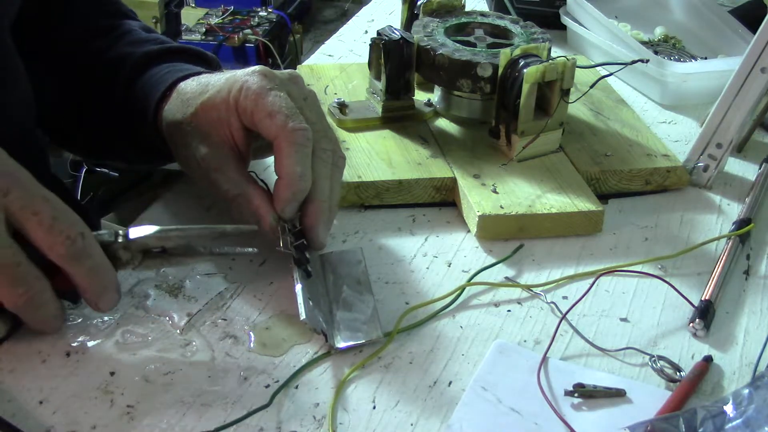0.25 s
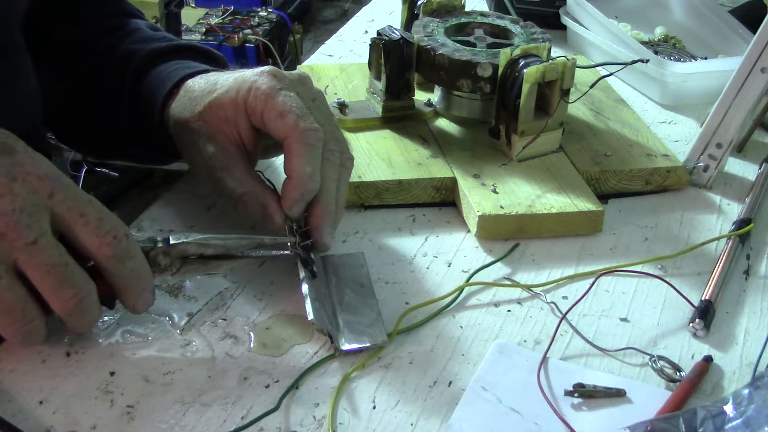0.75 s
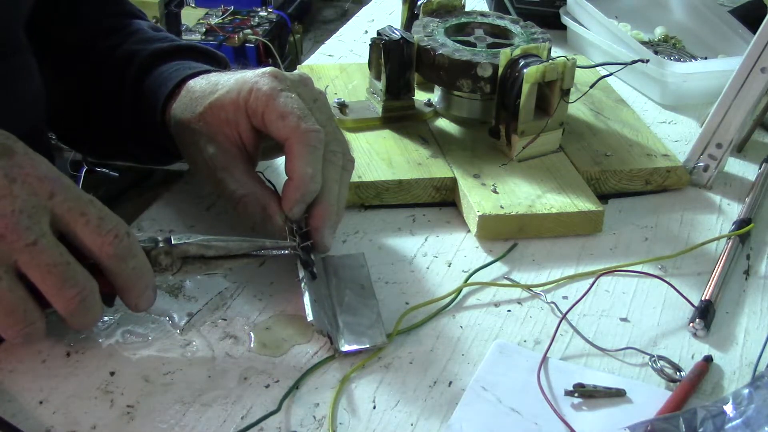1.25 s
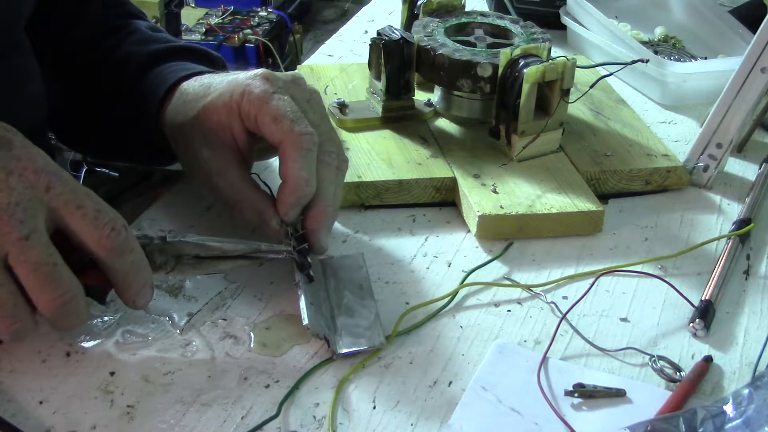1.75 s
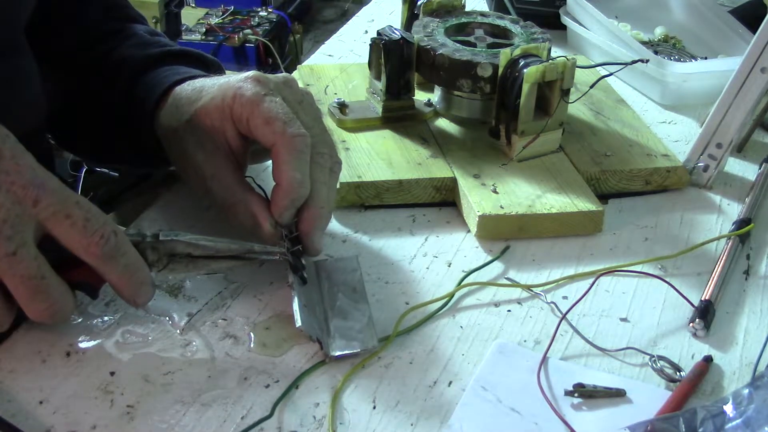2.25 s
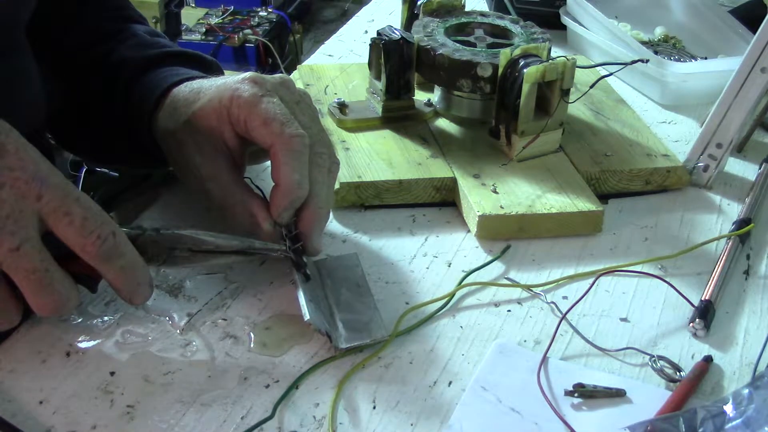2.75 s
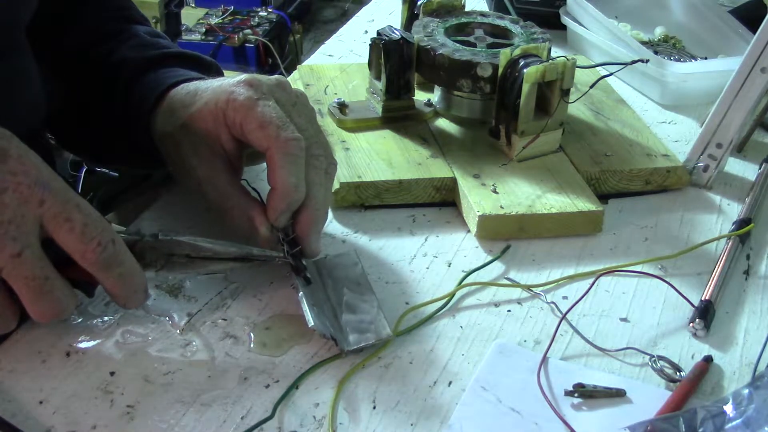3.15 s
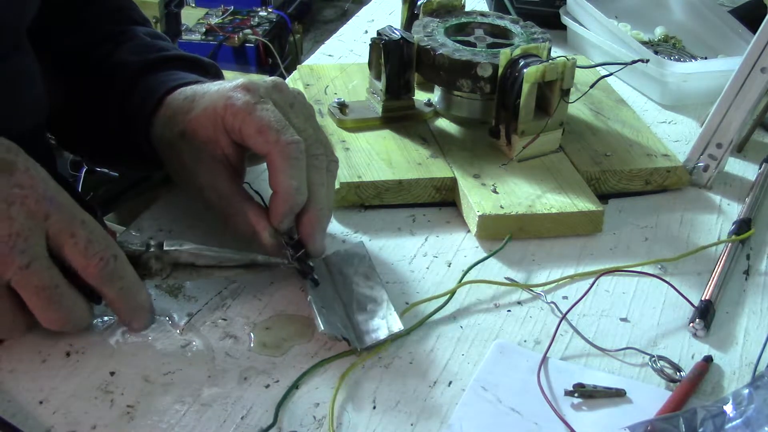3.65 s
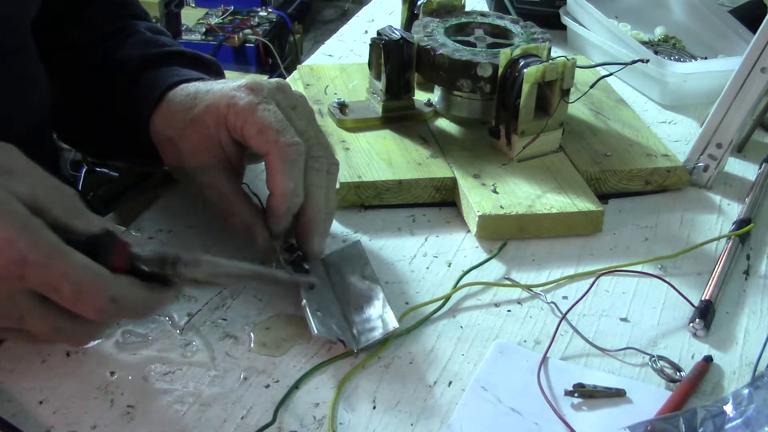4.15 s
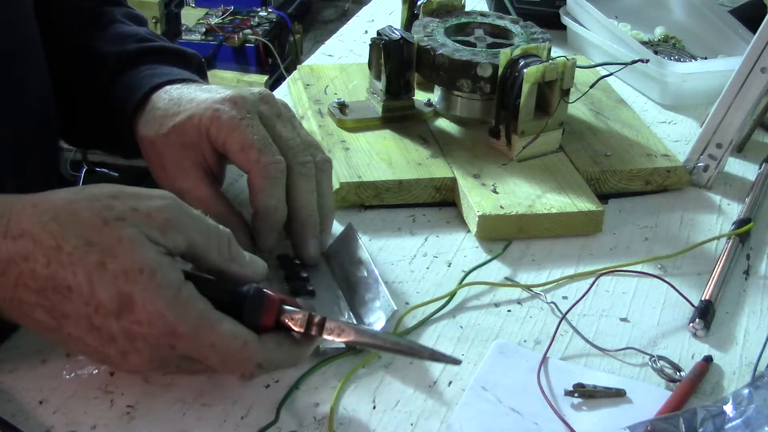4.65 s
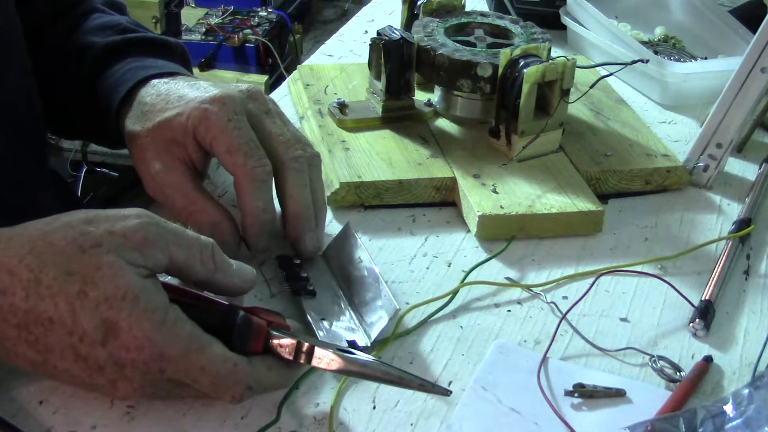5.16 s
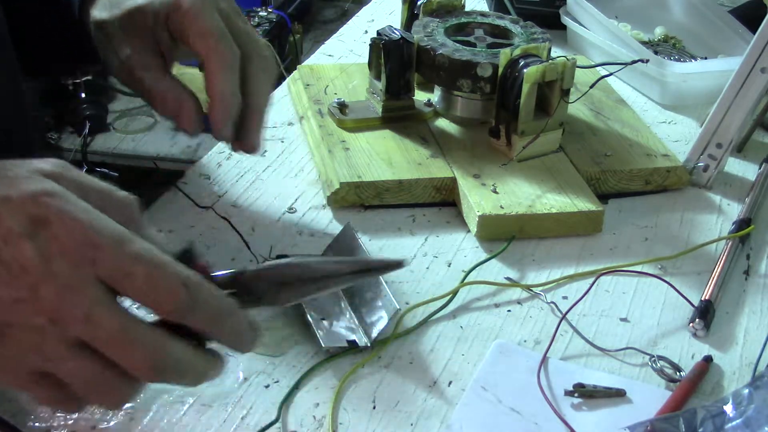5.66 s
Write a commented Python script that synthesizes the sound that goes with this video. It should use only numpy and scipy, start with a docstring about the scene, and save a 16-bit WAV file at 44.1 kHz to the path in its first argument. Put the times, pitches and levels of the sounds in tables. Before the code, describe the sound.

Close up, hands work a wire with pliers against a small metal bracket, over the constant low buzz of a transformer in a small room. Faint rustling comes first, with scattered bumps on wood and small steel clicks. The jaws then snap sharply, pinging the bracket, and the wire gives one short squeak. Quick knocks, clicks and fingertip taps on the bench lead to a soft closing rub.

```python
"""A transformer buzzes throughout in a small workshop. Close by, hands work a wire with pliers against
a sheet-metal bracket on a wooden bench. First skin and wire rustle; then fingers and tool bump the board
and the jaws click and slip, pinging the bracket, hardest at 3.6 s. At 4 s the wire slips in the jaws
with one rising squeak. A cluster of knocks, clicks and hollow taps follows, and a last rub fades out."""
import sys
import numpy as np
from scipy import signal
from scipy.fft import rfft, irfft, next_fast_len
from scipy.io import wavfile
from scipy.ndimage import map_coordinates

SR = 44100
rng = np.random.default_rng(int(sys.argv[2]) if len(sys.argv) > 2 else 0)


def output_pcm(signal):
    """Save a mono or channel-first signal as 16-bit PCM at the path in sys.argv[1].

    Samples are clipped to [-1, 1] before scaling.
    """
    pcm = np.clip(np.atleast_2d(signal).T, -1, 1) * 32767
    wavfile.write(sys.argv[1], SR, np.round(pcm).astype(np.int16))


N = 260631
T = np.arange(N) / SR
BUZZ_HZ = 120.024  # twice the mains frequency

# the bracket's ringing modes: (frequency [Hz], relative level [dB], t60 [s])
BRACKET_MODES = [(1338, -14, 0.083), (2663, -9, 0.063), (2795, -11.5, 0.068), (4380, -31, .13),
                 (5090, -25.5, .1), (6970, -17.5, 0.088), (8270, -18.5, 0.031), (10380, -9.5, 0.027),
                 (10720, -16, 0.022)]
# steel on steel: (time [s], snap gain [dB], tone centre [Hz], tone width [octaves], ring gain [dB])
JAW_CLICKS = [(.7912, -39.5, 8800, .55, -33.5), (.898, -43, 7500, .5, -45), (.92, -45, 8800, .6, -42),
              (1.30, -43.5, 4550, .56, -70), (1.975, -34.5, 4930, 1.06, -64),
              (2.124, -39.5, 3500, 1.2, -70), (2.1715, -25, 14000, 1.6, -64),
              (2.1726, -23.5, 1300, 1.3, -58), (3.6305, -14, 5800, 1.4, -35), (3.661, -30, 4000, 1.5, -55),
              (3.684, -24.5, 3400, 1.5, -37), (3.739, -50, 8000, .8, -38.5), (3.758, -30.5, 2500, .6, -55),
              (3.80, -45, 7500, .8, -49), (4.562, -31, 2750, 1, -28.5), (4.6682, -27, 2720, 1.14, -52),
              (4.769, -33, 2800, 1.44, -46), (4.789, -38.5, 2500, 1, -59), (5.168, -34, 1700, 2.2, -45)]
# dull knocks of the tool on the board: (time [s], level [dB], tone centre [Hz])
TOOL_KNOCKS = [(3.757, -35, 380), (3.802, -39, 280), (4.514, -37, 340), (4.606, -26, 240),
               (4.6293, -25.5, 620), (4.722, -29.5, 265), (4.839, -33.5, 300)]


def amp(db):
    """Decibels to gain."""
    return 10 ** (np.asarray(db) / 20)


def unit(x):
    """Scale to rms 1."""
    return x / np.sqrt(np.mean(x ** 2) + 1e-20)


def along(points, hz):
    """Read (frequency, value) points on a log-frequency axis."""
    freqs, values = np.transpose(points)
    return np.interp(np.log(hz + 1), np.log(freqs + 1), values)


def bell(hz, centre, octaves):
    """A bell of gain on the log-frequency axis."""
    return np.exp(-.5 * (np.log2((hz + 1) / centre) / octaves) ** 2)


def swell(time, width_s):
    """A Gaussian envelope of height 1."""
    return np.exp(-.5 * ((T - time) / width_s) ** 2)


def wobble(rate):
    """A smooth random curve, rate knots a second."""
    return map_coordinates(rng.standard_normal(int(N * rate / SR) + 4), [T * rate])


def filtered(x, response):
    """Zero-phase EQ by a gain function of frequency."""
    size = next_fast_len(N + SR // 2)
    return irfft(rfft(x, size) * response(np.fft.rfftfreq(size, 1 / SR)), size)[..., :N]


def sharp_impulse(response, size=1024):
    """The minimum-phase impulse of energy 1 with this tone colour."""
    cepstrum = irfft(np.log(response(np.fft.rfftfreq(size, 1 / SR)) + 1e-5))
    lag = np.arange(size)
    fold = (1 + np.sign(size // 2 - lag)) * (lag > 0)
    impulse = irfft(np.exp(rfft(cepstrum * fold)))
    return impulse / np.linalg.norm(impulse)


def add(track, time, sound):
    """Lay a sound into a track at a time in seconds."""
    part = track[round(time * SR):][:len(sound)]
    part += sound[:len(part)]


def diffuse(pair):
    """Two unrelated signals become a narrow, diffuse stereo field."""
    # likeness of left and right: (frequency [Hz], coherence [0-1])
    coherence = [(25, 0.2), (120, 0.75), (1000, 0.76), (4000, 0.7), (10000, 0.99)]
    angle = lambda hz: np.arccos(np.clip(along(coherence, hz), 0, 1)) / 2
    mid, side = filtered(pair, lambda hz: np.array([np.cos(angle(hz)), np.sin(angle(hz))]))
    return np.array([mid + side, mid - side])


def transformer(trim_db=-.24, waver_db=.5, stereo_scatter_db=.93, fade_db_per_s=.18, dispersion=.69):
    """The core twitches twice per mains cycle; its casing smears each twitch into a buzz."""
    # the core's harmonics: (multiple of the buzz rate, level [dB])
    harmonics = [(1, -79), (2, -58), (3, -80), (4, -64), (5, -72), (6, -76), (7, -80), (8, -65), (9, -60),
                 (10, -59), (11, -65), (12, -77), (13, -70), (14, -72), (15, -70), (16, -65), (19, -65),
                 (20, -78), (21, -78), (24, -75), (25, -74), (26, -72), (28, -81), (29, -76), (30, -73),
                 (31, -80), (32, -74), (34, -83), (35, -85), (36, -71), (37, -83), (38, -80), (39, -85),
                 (43, -74), (44, -85), (46, -82), (47, -82), (48, -75), (53, -78), (54, -84), (55, -86),
                 (56, -86), (57, -87), (59, -85), (66, -86), (70, -88), (71, -90), (74, -90), (106, -93),
                 (108, -85), (109, -91), (111, -88), (113, -89), (124, -95), (125, -97), (126, -96)]
    out = np.zeros((2, N))
    cycle = np.linspace(0, 1, 4097)
    for group in range(4):  # interleaved sets of harmonics waver separately
        waves = sum(amp(db + stereo_scatter_db * rng.standard_normal((2, 1)))
                    * np.cos(2 * np.pi * k * cycle - dispersion * k ** 2)
                    for k, db in harmonics[group::4])
        buzz = np.array([np.interp(BUZZ_HZ * T % 1, cycle, wave) for wave in waves])
        out += amp(waver_db * wobble(2.49)) * buzz
    return np.sqrt(2) * amp(trim_db - fade_db_per_s * (T - T.mean())) * out


def room_tone(level_db=-57.5, drift_db=.72, sizzle=.19, sizzle_above_hz=1000):
    """Soft workshop air whose treble pulses with the buzz."""
    # the air's colour: (frequency [Hz], relative level [dB])
    air_eq = [(20, -29), (45, -13.5), (70, -12), (105, -11.5), (145, -4), (210, 2), (320, -1.5),
              (520, -3.5), (850, -7.5), (2000, -11.5), (5000, -19), (8000, -22), (11000, -27.5),
              (15500, -31.5)]
    noise = unit(filtered(diffuse(rng.standard_normal((2, N))), lambda hz: amp(along(air_eq, hz))))
    treble = filtered(noise, lambda hz: hz ** 2 / (hz ** 2 + sizzle_above_hz ** 2))
    pulse = sizzle * np.cos(2 * np.pi * BUZZ_HZ * T)
    return amp(level_db - drift_db * wobble(2.81)) * (noise + pulse * treble)


def rustle(attack_s=.024, release_s=.06, grain_db=4, hiss_hz=8000):
    """Skin and wire slide in tiny uneven catches; light brushes give only a high hiss."""
    # sliding strokes: (start [s], hold [s], level [dB])
    rubs = [(0, 1.15, -67), (2.1, .08, -63), (3.636, 0.17, -59), (4.43, 0.076, -55.5), (4.512, .33, -60),
            (5.17, .73, -65.5)]
    # the friction's colour: (frequency [Hz], relative level [dB])
    rub_eq = [(150, -26), (500, 13), (1300, 11.5), (2200, 11), (3500, 1.5), (6000, 2), (8500, -6.5),
              (12000, -17), (15500, -37)]
    # light finger brushes: (time [s], level [dB], half length [s])
    brushes = [(0.069, -61, 0.013), (.48, -71, 0.027), (2.925, -67, .004), (4.47, -66, .035),
               (4.62, -66, .03), (4.84, -67, .025), (5.33, -76, .08), (5.822, -67.5, 0.021)]

    def catches():
        return rng.standard_normal(N) * amp(grain_db * np.tanh(wobble(250)) + 2.3 * np.tanh(wobble(25)))

    # rubbing also stirs the bracket's modes
    resonance = lambda hz: 1 + .63 * sum(bell(hz, mode[0], octaves=.015) for mode in BRACKET_MODES)
    friction = unit(filtered(catches(), lambda hz: amp(along(rub_eq, hz)) * resonance(hz)))
    hiss = unit(filtered(catches(), lambda hz: bell(hz, hiss_hz, octaves=.48)))
    pressure = sum(
        amp(db) * np.interp(T, np.cumsum([start - attack_s, attack_s, hold, release_s]), [0, 1, 1, 0])
        for start, hold, db in rubs)
    brushing = sum(amp(db) * swell(time, width) for time, db, width in brushes)
    return pressure * friction + brushing * hiss


def board_pushes(fidgets_per_s=3, hz_per_octave=370):
    """Cues for the board: (time [s], level [dB], tone centre [Hz], tone width [octaves])."""
    # soft finger bumps: (time [s], level [dB], tone centre [Hz])
    bumps = [(0.191, -47, 210), (.794, -30.5, 160), (.899, -33.5, 180), (.926, -24.5, 225),
             (1.68, -47, 170), (1.8446, -24.8, 270), (2.115, -39, 220), (2.147, -40, 240),
             (2.255, -31, 260), (2.376, -33, 280), (3.493, -43, 300), (3.64, -22, 340), (4.462, -41, 340)]
    # hollow fingertip taps, all on one spot: (time [s], level [dB])
    taps = [(3.614, -32.5), (3.74, -39), (4.24, -39), (4.9872, -33.5), (5.015, -37), (5.178, -45),
            (5.301, -35)]
    # the fingers fidget faintly, in loose time
    chance = rng.standard_normal((int(fidgets_per_s * N / SR), 2))
    fidgets = [((k + (1 + np.tanh(late)) / 2) / fidgets_per_s, -61 + 2 * hard, 135)
               for k, (late, hard) in enumerate(chance)]
    pushes = [(time, db, hz, .8) for time, db, hz in TOOL_KNOCKS]
    # each click jolts the board, hard ones far more
    pushes += [(time, 1.3 * db - 1, 300, 1.2) for time, db, *_ in JAW_CLICKS]
    pushes += [(time, db, 532, .52) for time, db in taps]
    # a firmer push is both higher and wider in tone
    return pushes + [(time, db, hz, hz / hz_per_octave) for time, db, hz in bumps + fidgets]


def board_thumps(attack_s=.0094, scatter_db=3, low_cut_hz=90):
    """Soft pushes ring the wooden board's low modes, firmer ones its higher modes."""
    # the board's modes: (frequency [Hz], relative level [dB], t60 [s])
    board_modes = [(137.8, -13.5, 0.17), (185.8, -3, 0.05), (231.1, 3.5, 0.048), (263.2, -2.5, 0.053),
                   (309.6, -5, 0.058), (347, -6.5, 0.043), (402, -11.5, 0.035), (466, -8.5, 0.059),
                   (498.5, -3, 0.078), (526.7, -2.5, 0.041), (604.6, -6.5, 0.054), (690, -8.5, 0.068),
                   (825, -9.5, 0.041), (956, -6.5, 0.041), (1106, -5.5, 0.045)]
    hz, db, t60 = np.transpose(board_modes)
    out, t = np.zeros(N), np.arange(SR // 3) / SR
    envelopes = amp(db[:, None] - 60 * t / t60[:, None]) * (1 - np.exp(-t / attack_s))
    for time, level, centre, octaves in board_pushes():
        # each spot on the board meets the modes with other phases and strengths
        phases = .3 * rng.standard_normal((len(hz), 1))
        strengths = bell(hz, centre, octaves) * amp(scatter_db * rng.standard_normal(len(hz)))
        thump = strengths @ (envelopes * np.sin(2 * np.pi * hz[:, None] * t + phases))
        add(out, time, amp(level) * thump / np.abs(thump).max())
    # the thumps carry no deep bass
    return signal.sosfilt(signal.butter(2, low_cut_hz, "highpass", fs=SR, output="sos"), out)


def plier_clicks(chatter=.31, chatter_t60=.037, snap_trim_db=-1):
    """Each contact is a sharp snap with a brief chatter of steel, and sets the bracket ringing."""
    # the pliers' colour: (frequency [Hz], relative level [dB])
    steel_eq = [(200, -31.5), (700, 9), (1200, 6.5), (1600, 2), (2200, 4.5), (2800, 2), (3300, -0.5),
                (4200, 0.5), (6000, -2), (7400, -5.5), (8800, -8.5), (11500, -19.5), (15500, -31)]
    # each tool knock carries a dull tick of steel, in the columns of JAW_CLICKS
    ticks = [(time, db - 7, 1000, 1.45, db - 22) for time, db, _ in TOOL_KNOCKS]
    out, t = np.zeros(N), np.arange(SR // 5) / SR
    for time, snap_db, centre, octaves, ring_db in JAW_CLICKS + ticks:
        force = chatter * rng.standard_normal(len(t)) * amp(-60 * t / chatter_t60)
        force[0] = 2.87  # the snap's transient
        colour = sharp_impulse(lambda hz: amp(along(steel_eq, hz)) * bell(hz, centre, octaves))
        add(out, time, amp(snap_db + snap_trim_db) * signal.fftconvolve(force, colour))
        for hz, mode_db, t60 in BRACKET_MODES:
            envelope = bell(hz, centre, octaves) * amp(ring_db + mode_db - 60 * t / t60)
            add(out, time, envelope * np.sin(2 * np.pi * hz * t + rng.uniform(0, 2 * np.pi)))
    return out


def wire_squeak(lock_s=4.0425, lock_hz=2058, climb_hz_per_s=21000, swell_s=.003, ring_t60=.24):
    """Stick-slip climbs in pitch, edgy at first, then pure as it locks on a resonance of the metal."""
    until_lock = np.clip(lock_s - T, 0, lock_hz / climb_hz_per_s)
    since_lock = np.maximum(T - lock_s, 0)
    grip = swell(lock_s - .0078, width_s=.0055)  # the rough bite just ahead of the lock
    pitch = lock_hz - climb_hz_per_s * until_lock
    jitter = 1 + .019 * grip * wobble(500)
    phase = 2 * np.pi * np.cumsum(pitch * jitter) / SR
    ring = amp(-46 - 60 * since_lock / ring_t60) * (1 - np.exp(-since_lock / swell_s))
    envelope = amp(-41.5) * grip + amp(-27.5) * swell(lock_s, swell_s) + ring
    overtones = sum(amp(db) * np.sin(k * phase) for k, db in [(2, -44), (3, -55), (4, -66)])
    return envelope * np.sin(phase) + grip * overtones


def workshop_reverb(send, predelay_s=.005):
    """Near walls answer with a short diffuse tail."""
    # the room's decay: (frequency [Hz], t60 [s])
    decay = [(150, 0.17), (600, 0.42), (2000, 0.18), (6000, 0.14), (12000, 0.047)]
    hz, t, noise = signal.stft(rng.standard_normal((2, SR // 2)), SR, nperseg=256)
    tail = signal.istft(noise * amp(-60 * t / along(decay, hz)[:, None]), SR, nperseg=256)[1]
    tail /= np.linalg.norm(tail[0])
    delayed = np.pad(send, (round(predelay_s * SR), 0))[None]
    return diffuse(signal.fftconvolve(delayed, tail, axes=1)[:, :N])


def scene():
    """Close handwork with a little reverb, over a bed of buzz and room tone."""
    wood = board_thumps()
    metal = plier_clicks() + rustle()
    squeak = wire_squeak()
    reverb = workshop_reverb(amp(-16.5) * wood + amp(-8.5) * metal + amp(-12.5) * squeak)
    balance = amp([[-.2], [.2]])  # a hair to the right
    return (wood + metal + squeak + reverb + transformer() + room_tone()) * balance


def record(dry, high_cut_hz=15800):
    """A brick-wall high cut on the whole mix."""
    return filtered(dry, lambda hz: hz < high_cut_hz)


dry = scene()
out = record(dry)
output_pcm(out)
```